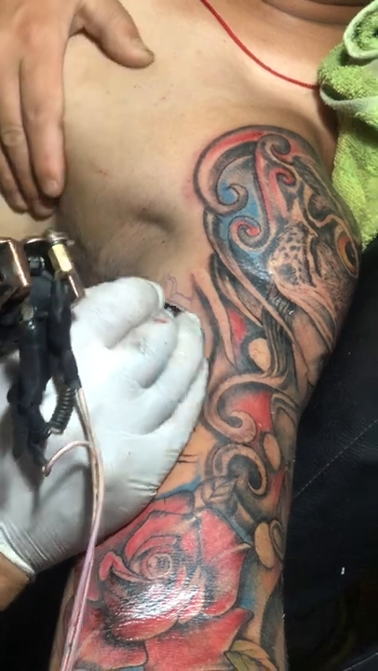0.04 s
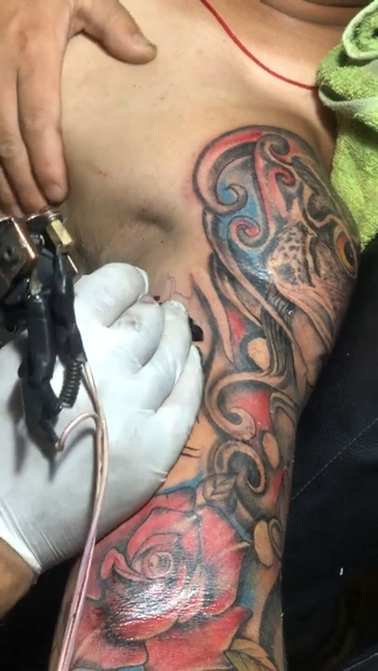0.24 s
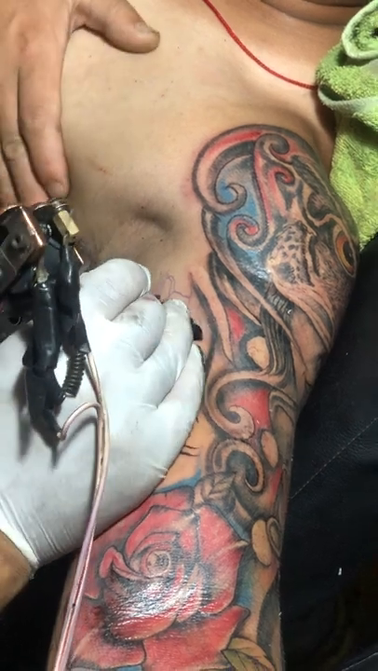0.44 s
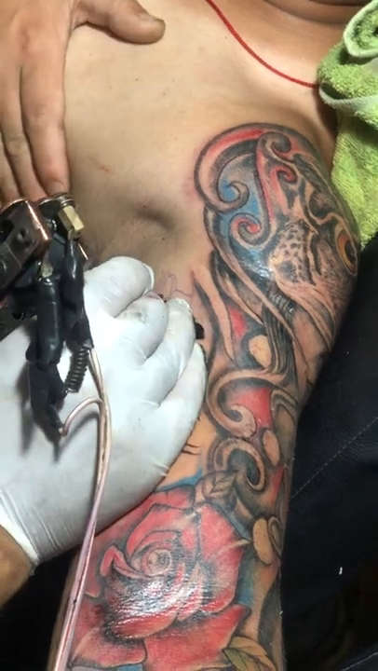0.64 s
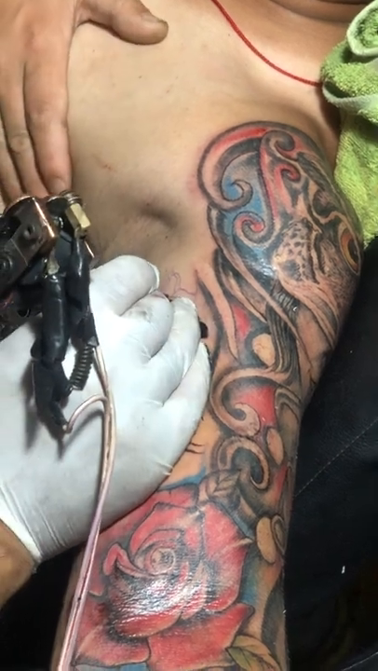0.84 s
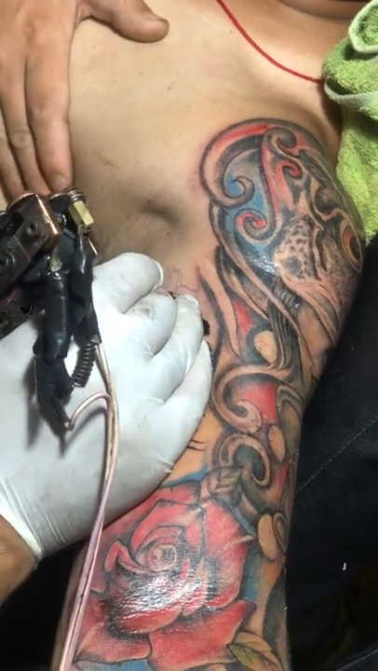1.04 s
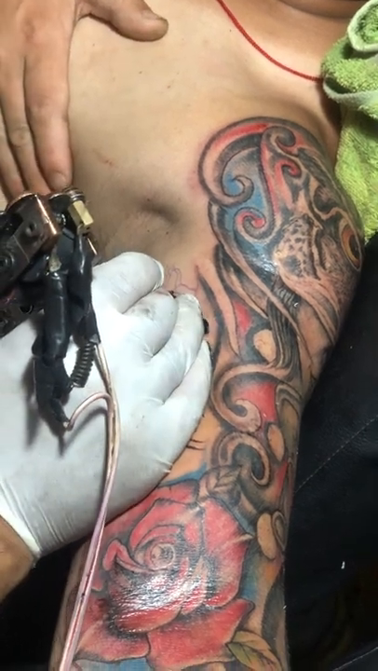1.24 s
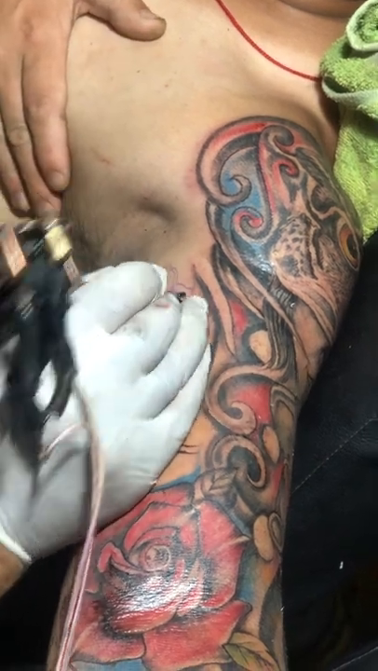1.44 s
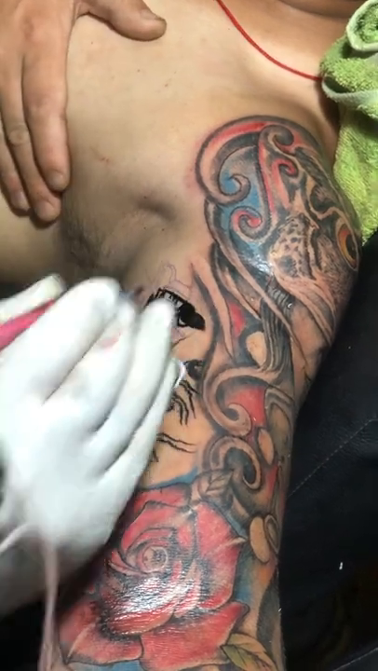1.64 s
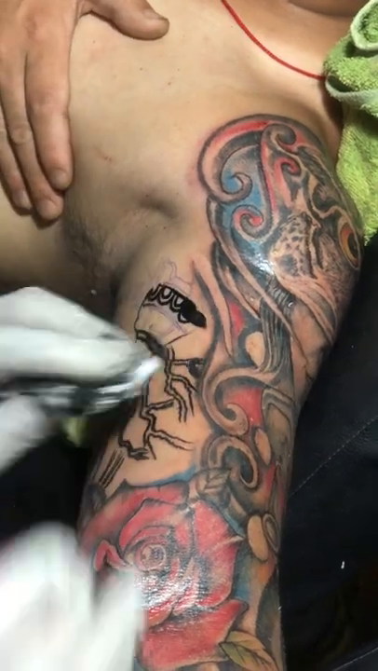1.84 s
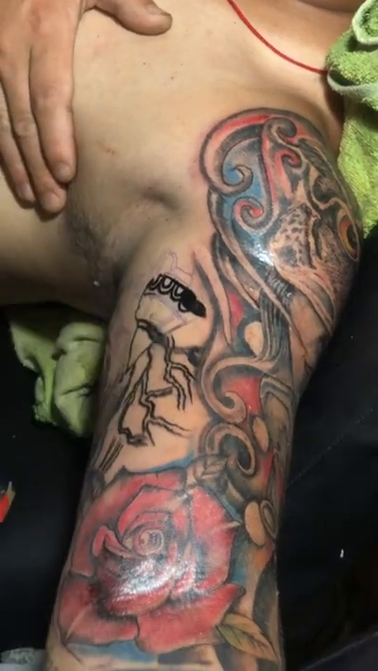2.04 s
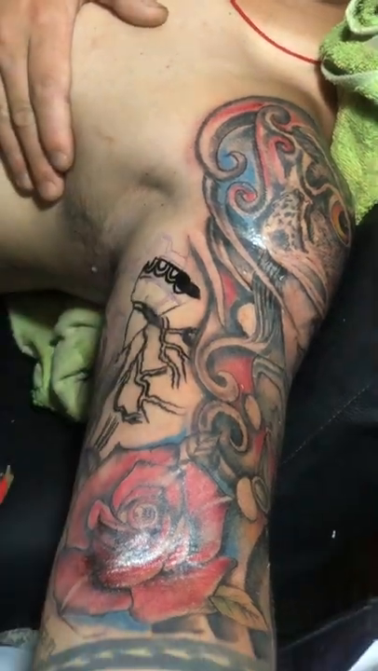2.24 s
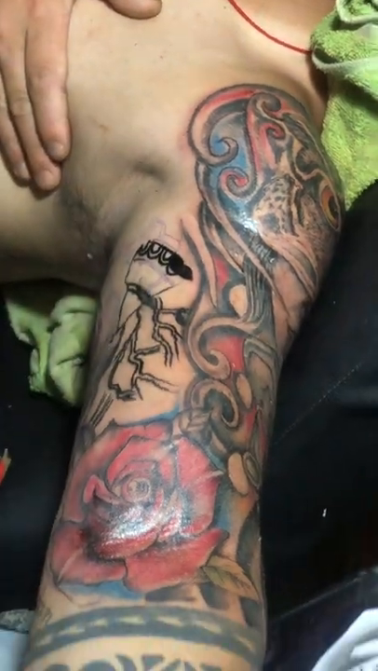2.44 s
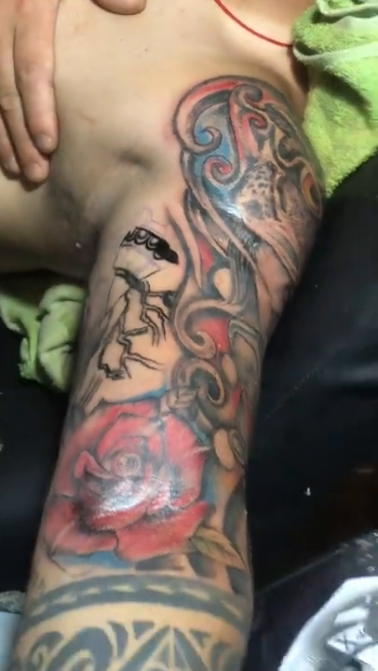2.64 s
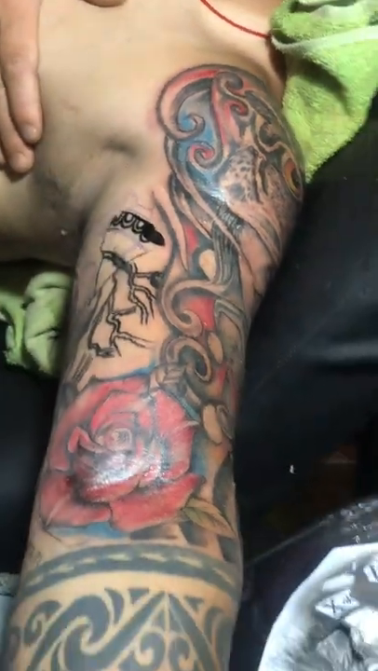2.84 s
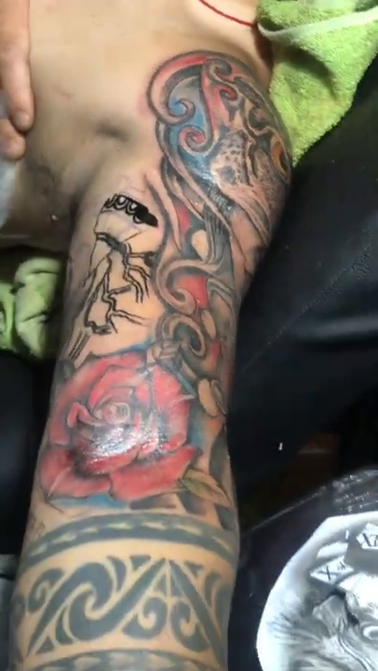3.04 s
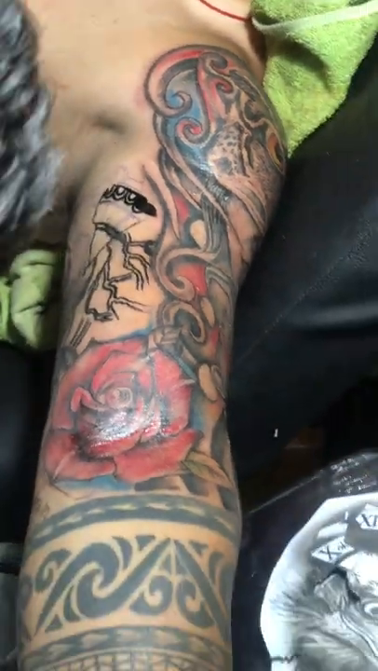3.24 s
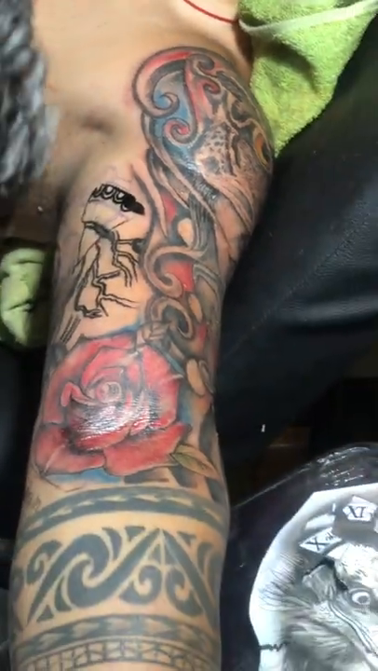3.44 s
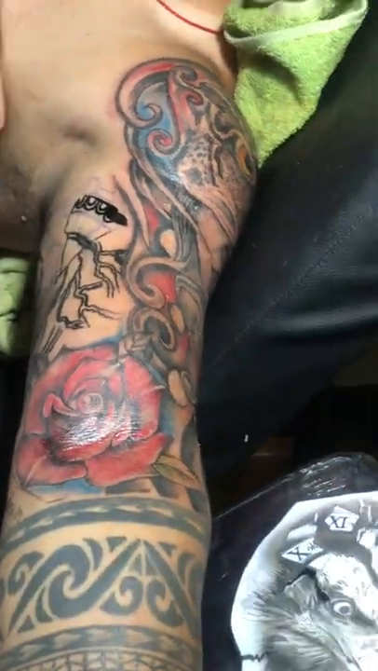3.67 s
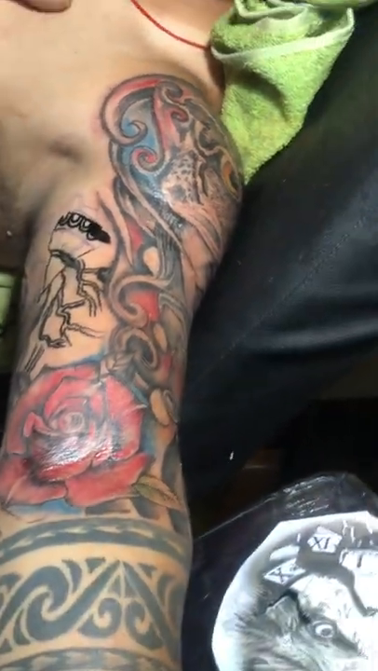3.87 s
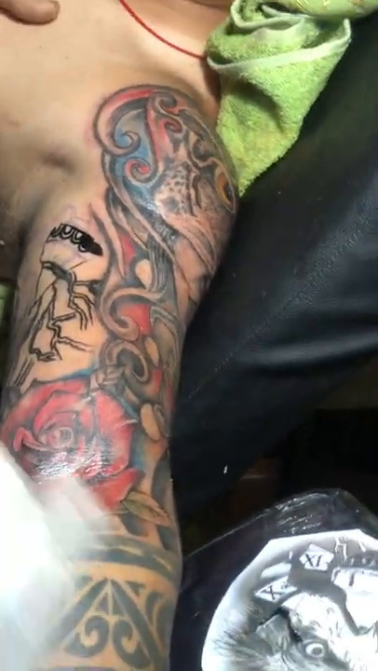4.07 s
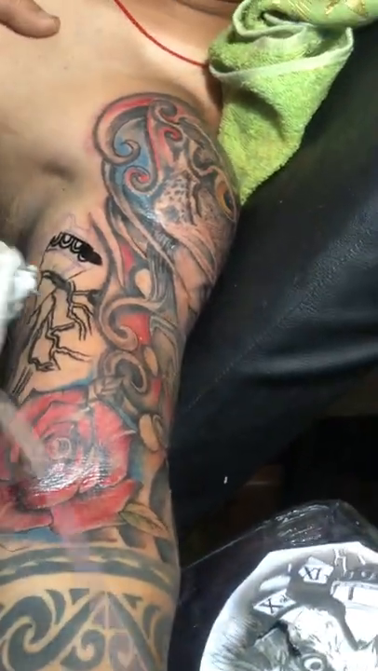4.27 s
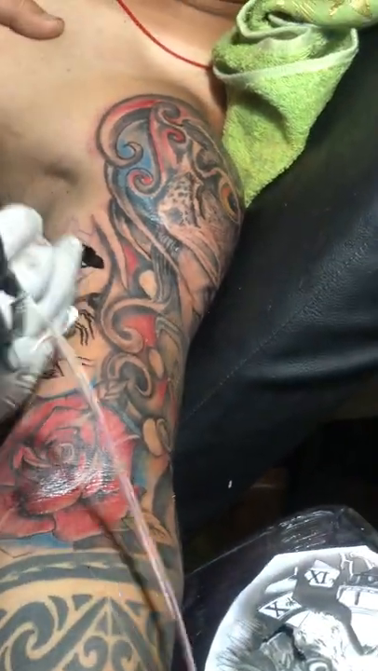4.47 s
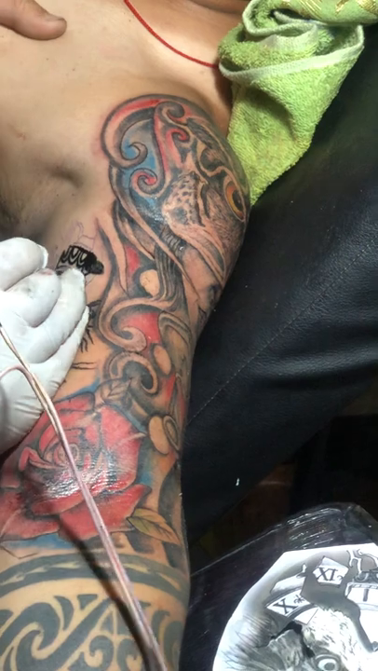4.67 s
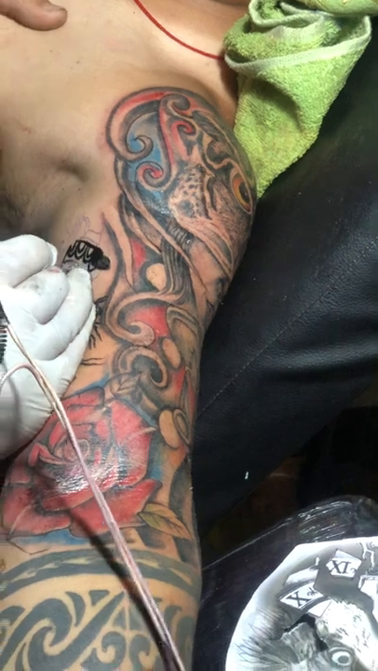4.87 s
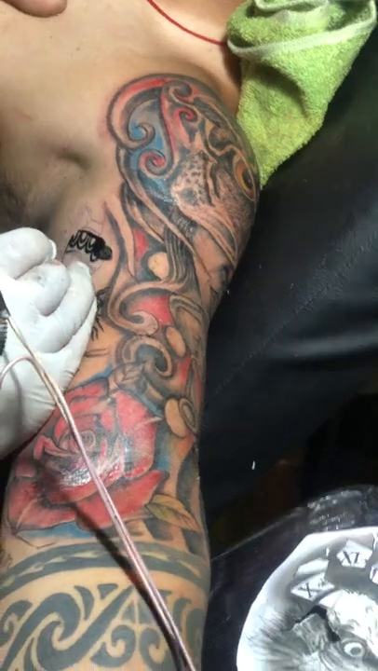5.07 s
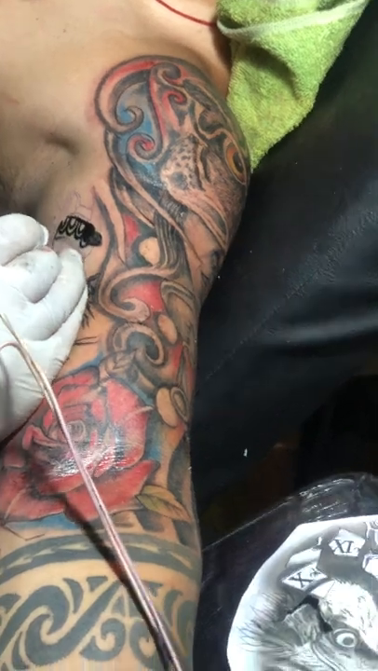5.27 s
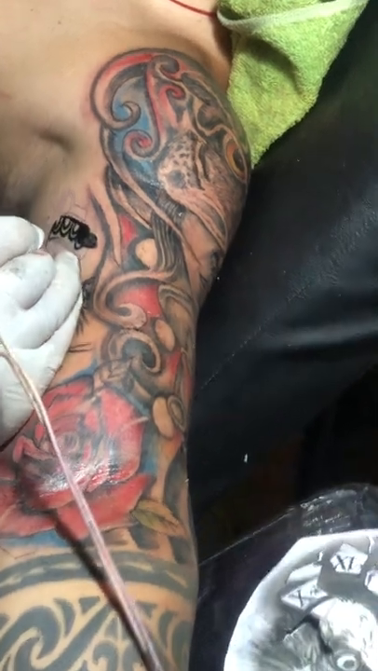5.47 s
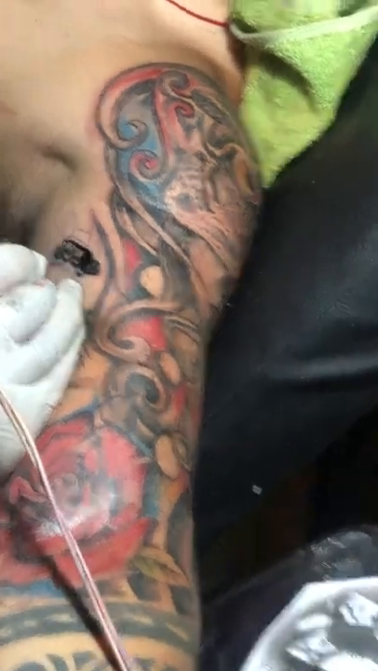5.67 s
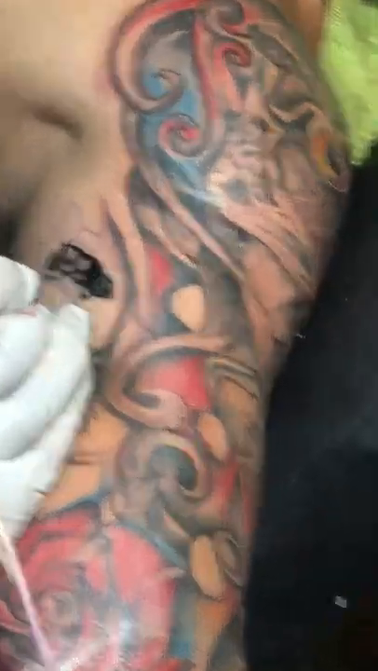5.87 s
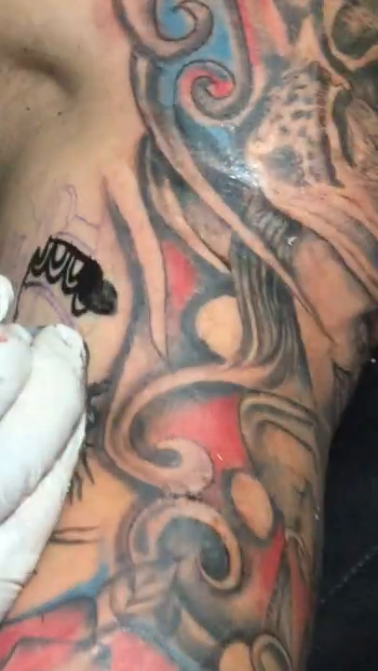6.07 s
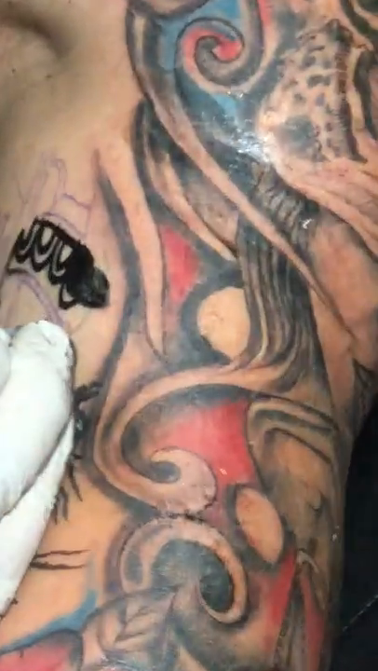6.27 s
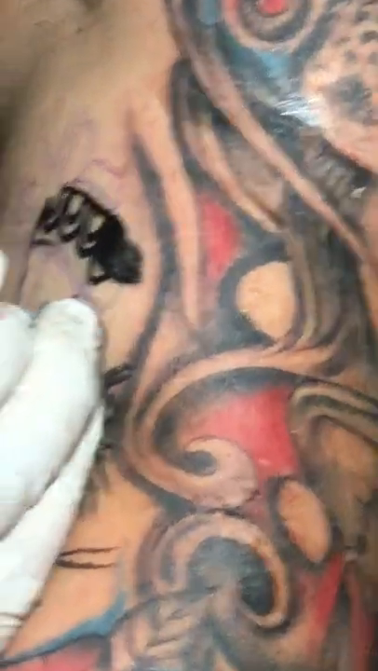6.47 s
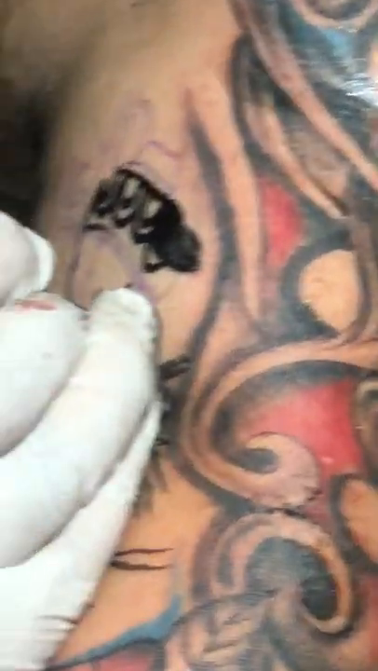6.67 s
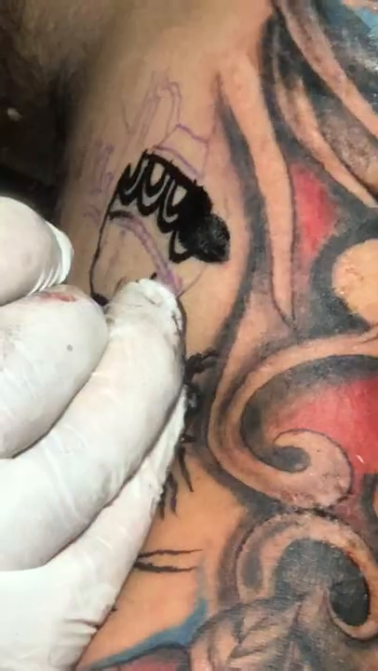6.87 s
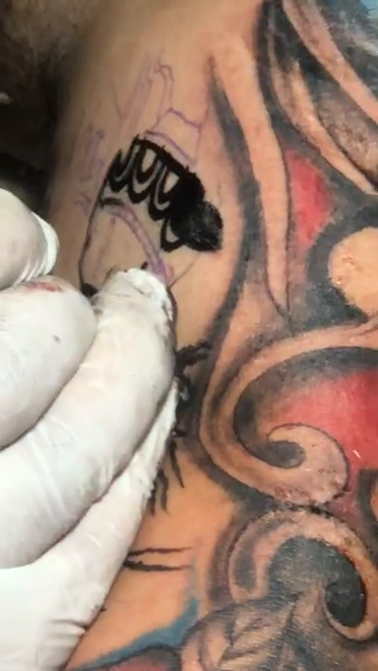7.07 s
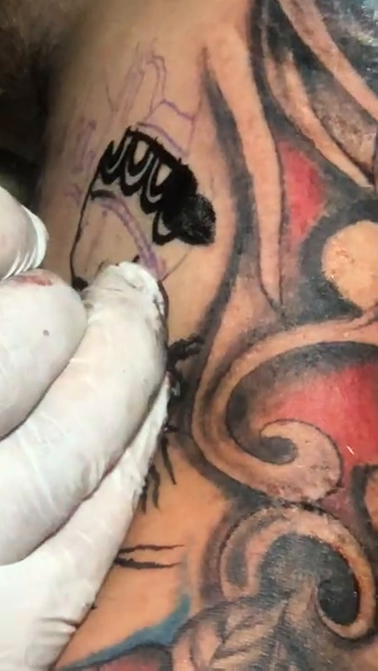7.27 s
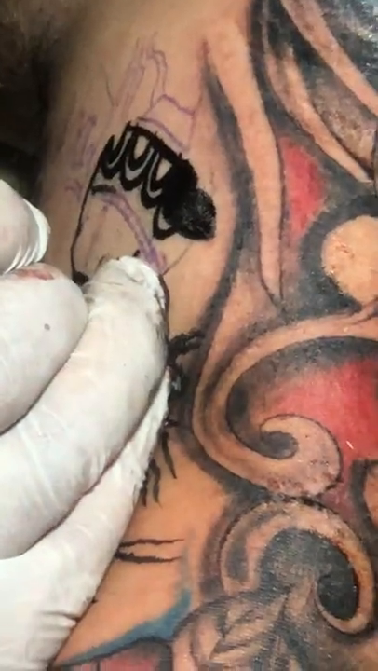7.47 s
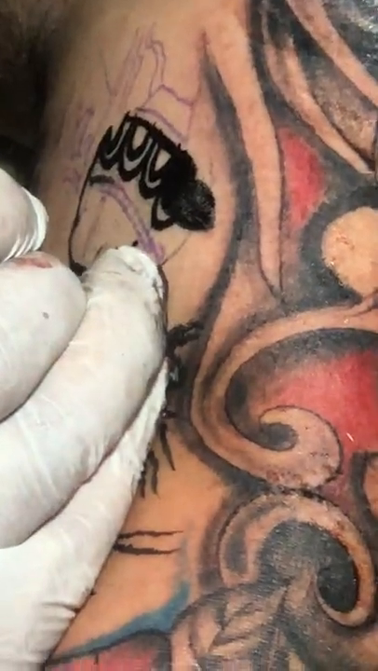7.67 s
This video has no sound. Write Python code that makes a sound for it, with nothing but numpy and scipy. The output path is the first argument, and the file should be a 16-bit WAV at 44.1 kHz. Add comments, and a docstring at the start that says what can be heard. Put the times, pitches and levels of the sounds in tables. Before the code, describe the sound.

In a small, fairly dry studio, the sharp metallic buzz of a tattoo machine pulses close up. It works on skin, stops for a moment of faint bumps and ticks, then restarts, rattling freely as it is turned in the air. It pauses again briefly before settling into a longer, steady spell on the skin, over a low hum and a faint distant drone.

```python
"""A close, throbbing buzz: a coil tattoo machine in a small studio, switched off twice and run in the air
between two spells on the skin. Its armature hits the coil core about 107 times a second; mains ripple on
the supply beats with the strokes and makes the throb. The colour shifts as the machine is turned, and it
rattles more in the air than in the skin.
Underneath: soft handling bumps, a plop, two ticks, room rumble, hum and a far drone."""
import sys
import numpy as np
from scipy import signal
from scipy.fft import rfft, irfft, next_fast_len
from scipy.io import wavfile
from scipy.ndimage import uniform_filter1d, map_coordinates

SR = 44100
rng = np.random.default_rng(int(sys.argv[2]) if len(sys.argv) > 2 else 0)


def generate_wav(sig):
    """Save sig (samples, or channels by samples) to the path in sys.argv[1] as 16-bit PCM at SR."""
    pcm = np.round(np.clip(np.atleast_2d(sig).T, -1, 1) * 32767).astype(np.int16)
    wavfile.write(sys.argv[1], SR, pcm)


N = 340000

# colours the machine throws at the microphone, one for each way it is held: f/Hz, level/dB
INKING = [(1500, -51), (2550, -27), (2770, -18.5), (3000, -16.5), (3400, -23), (4220, -7.5), (4800, -13.5),
          (5860, -7.5), (6570, -13.5), (7540, -7), (8260, -11.5), (9330, -5.5), (9920, -9.5), (10900, -14),
          (14800, -19.5), (15800, -50)]
LIFTED = [(1350, -31.5), (2900, -8), (3850, -12.5), (4750, -7.5), (6200, 0.5), (7110, -6), (8200, -3),
          (10300, -9.5), (11200, -0.5), (13000, -3.5), (13900, -8), (15800, -11)]
ASIDE = [(1350, -31), (4200, -13.5), (5070, -5.5), (5650, 1.5), (6500, -7), (8000, -11.5), (9000, -1.5),
         (9800, -5), (10400, -8.5), (11300, -3.5), (13000, -2), (14000, -11), (15800, -8)]
SWOOPING = [(1500, -29), (2900, -7), (4000, -12.5), (5400, -2), (7000, -1), (9600, -5), (11000, -11.5),
            (14000, -8), (14800, -2), (15800, -7)]
RETURNING = [(1350, -36), (2300, -21.5), (2900, -7), (3500, -19), (4750, -6), (6610, -5.5), (9200, -6),
             (10800, -11.5), (14800, -12)]
SETTLING = [(1530, -40), (2600, -24), (2900, -16), (3570, -21.5), (4200, -4.5), (4480, -13), (4720, -4),
            (5790, -10.5), (6340, -5.5), (7210, -12.5), (9170, -4), (10800, -14), (12400, -11),
            (13500, -14), (14700, -13), (15800, -23)]
BEARING = [(1530, -45), (2600, -15.5), (3500, -14), (4100, -3), (4800, -0.5), (5300, -4), (5880, -8.5),
           (6990, -5), (8440, -3.5), (9200, 1), (10800, -12.5), (12100, -7), (15800, -21)]
LINING = [(1530, -39), (2600, -19), (3000, -4.5), (3440, -15), (4100, -0.5), (4450, -10), (4900, 0.5),
          (5200, 0.5), (5560, 0), (6480, -7), (9240, 2), (11100, -6.5), (13300, -5), (15800, -18)]
# holds, each crossfading into the next: from/s, to/s, colour, click level/dB, lift off the skin/0-1
HOLDS = [(0, 1.417, INKING, 9, 0.02), (2.2, 2.382, RETURNING, 5, 0.21), (2.45, 2.9, LIFTED, 4, 0.27),
         (3.26, 3.659, ASIDE, 7.5, 0.8), (3.8, 3.96, SWOOPING, 6, 0.4), (4.3, 4.496, RETURNING, 5.5, 0.31),
         (4.667, 5.47, SETTLING, 5, 0.1), (5.704, 6.17, BEARING, 7, 0.1), (6.45, 7.797, LINING, 9.5, 0.11)]
# presses of the foot switch: on/s, off/s
PRESSES = [(0.0, 1.495), (2.3413, 3.962), (4.347, 7.71)]


def machine(ring_db=2.0, ring_t60=0.012, free_rattle_db=-5, skin_damping_db=14, knock_db=-25,
            return_db=-14, return_after_s=0.0033):
    """Each blow clicks, rings the steel and rattles the needle bar. Returns aimed and all-round sound."""
    # slow bending waves make the lower ringing trail the click: f/Hz, lag/s
    lag = [(2500, 0.001093), (4300, 0.0006), (6000, 0.0003), (9500, 0.000024)]
    # colour sent into the room, whatever the hold: f/Hz, level/dB
    room_colour = [(1700, -24.5), (2900, -4), (3600, -10.5), (4600, -0.5), (9500, -2), (10500, -5),
                   (15000, -8)]
    # dull push of the whole body: f/Hz, level/dB
    body_colour = [(300, -48), (850, 21.5), (1120, 13.0), (1550, 11.5), (2400, 18), (4000, 1.0)]
    times, gains, hardness = strokes()
    blows = pulses(times, gains)
    # the spring snaps back on its contact screw
    returns = times + return_after_s + .00012 * rng.standard_normal(len(times))
    contacts = blows + chatter(times, gains) + amp(return_db) * pulses(returns, gains)
    ring = amp(ring_db) * moving(contacts, lambda: dense_ring(ring_t60))
    rattle_power = np.abs(through(blows ** 2, dense_ring(t60=0.057) ** 2))
    rattle = np.sqrt(rattle_power) * rng.standard_normal(N)
    tones = ringing(blows, pulses(times, gains * hardness))
    aimed = tones
    for k, (_, _, colour, click_db, lift) in enumerate(HOLDS):
        share = held(np.arange(len(HOLDS)) == k)
        rattle_db = free_rattle_db - skin_damping_db * (1 - in_air(lift))
        steel = amp(click_db) * contacts + ring + amp(rattle_db) * rattle
        steel /= np.linalg.norm(amp([click_db, ring_db, rattle_db]))
        aimed = aimed + share * through(steel, click(colour))
    aimed = filtered(aimed, lambda hz: np.exp(-2j * np.pi * np.cumsum(along(lag, hz)) * hz[1]))
    knock = amp(knock_db) * through(blows, click(body_colour))
    return close_reflection(aimed) + knock, tones + through(contacts, click(room_colour))


def strokes(stroke_hz=107, start_slow_hz=1.46, spin_up_s=.06, mains_hz=50.0435, crest_s=.0027,
            throb_db=0.67, hurry_s=0.0002186, lead_rad=0.55, jitter_s=.000006, first_db=-6):
    """Times, strengths and hardness (0-1) of the armature's blows; from rest it starts a little slow."""
    # the speed drifts with load and grip: t/s, rate offset/Hz
    drift = [(0.0, 0.4), (0.65, 0.65), (1.5, 0.01), (2.95, -0.59), (3.75, 0.35), (3.96, -0.14),
             (4.95, -0.44), (5.4, 0.07), (6.3, -0.7), (7.7, -0.56)]
    runs = []
    for on, off in PRESSES:
        from_rest = on > 0
        t = np.arange(on, off, 1 / SR)
        slowing = from_rest * start_slow_hz * np.exp((on - t) / spin_up_s)
        rate = stroke_hz + np.interp(t, *np.transpose(drift)) - slowing
        cycles = np.cumsum(rate) / SR
        due = np.interp(np.arange(int(cycles[-1]) + 1), cycles, t)
        # a stroke near the crest of the rectified mains is pulled harder and comes sooner
        ripple = 2 * np.pi * 2 * mains_hz * (due - crest_s)
        level = throb_db * np.cos(ripple)
        level[0] += from_rest * first_db  # the first swing is weak
        times = due - hurry_s * np.cos(ripple + lead_rad) + jitter_s * rng.standard_normal(len(due))
        runs.append([times, amp(level) * np.sqrt(SR / stroke_hz), np.maximum(np.cos(ripple), 0)])
    return np.concatenate(runs, axis=1)


def chatter(times, gains, after_s=0.000403, spread_s=0.000597, db=-11, scatter_db=2.5):
    """The loose needle bar knocks unevenly in its eye just after each blow."""
    late, size = rng.standard_normal((len(times), 2)).T
    return pulses(times + after_s + spread_s * np.abs(late), gains * amp(db + scatter_db * size))


def ringing(blows, hard_blows, frame_db=-21, free_db=-20, zing_db=-5, air_db=-9,
            clang_db=4.5, clang_s=0.053):
    """Frame and springs ring most with the needle in the skin; in the air the free bar takes over."""
    # modes of the steel: f/Hz, level/dB, t60/s
    frame = [(1089, 3.5, 0.1), (1167, 1.5, 0.11), (1274, -5, 0.12), (1819, -2, 0.1), (2110, 0, 0.12),
             (2644, 8, 0.093), (3083, 1, 0.15)]  # woken by every blow
    springs = [(4228, 0, 0.11), (4660, -0.5, 0.1), (5078, -4, 0.1), (5185, -3.5, 0.1), (5290, 0, 0.1)]  # a high shimmer
    zing = [(3514, 3, 0.037), (5980, 13, 0.042), (7900, -1, 0.014), (9770, 13, 0.022), (9830, 19.5, 0.017)]  # woken by the harder blows only
    free_bar = [(856, -3.5, 0.1), (958, -4, 0.11), (1069, -0.5, 0.074), (2083, 2, 0.07), (2750, 17, 0.028)]  # needle bar swinging clear of the skin
    t = np.arange(N) / SR
    air = in_air(hand_lift())
    springs_db = np.interp(t, [5.47, 5.56], [-15.5, -6])  # a change of grip brings the springs up
    loaded = (amp(frame_db) * through(blows, modes(frame))
              + amp(springs_db) * through(blows, modes(springs))
              + amp(zing_db) * through(hard_blows, modes(zing)))
    free = amp(free_db) * through(blows, modes(free_bar))
    # the steel clangs harder just after switching on
    clang = sum((t >= on) * np.exp(-np.abs(t - on) / clang_s) for on, _ in PRESSES if on > 0)
    return amp(clang_db * clang) * (amp(air_db * air) * loaded + air * free)


def dense_ring(t60, size=4096, onset_s=0.0011, smooth_bins=25):
    """Many close modes that build up, share the energy evenly over the band and die together; energy 1."""
    age = np.arange(size) / SR
    build_up = 1 - np.exp(-(age / onset_s) ** 2)
    spectrum = rfft(rng.standard_normal(size) * amp(-60 * age / t60) * build_up)
    contour = np.sqrt(np.abs(uniform_filter1d(np.abs(spectrum) ** 2, smooth_bins)))
    return norm(irfft(spectrum / contour)[:size // 2])


def held(values):
    """One value per hold, gliding from each hold to the next."""
    edges = np.sort([s for hold in HOLDS for s in hold[:2]])
    return np.interp(np.arange(N) / SR, edges, np.repeat(values, 2))


def hand_lift():
    """How far the machine is raised off the skin, 0-1."""
    return held([hold[-1] for hold in HOLDS])


def in_air(lift, clear_lift=0.2514):
    """0 with the needle in the skin, 1 when it swings free."""
    return np.clip(lift / clear_lift, 0, 1)


def moving(x, new_response, creep_per_s=0.794, swing_per_s=5.55):
    """x through a response whose grain changes with travel: slowly on the skin, fast in the air."""
    place = np.cumsum(creep_per_s + swing_per_s * in_air(hand_lift())) / SR  # in treble wavelengths
    out = np.zeros(N + SR)
    for k in range(int(np.ceil(place[-1])) + 1):
        near = np.flatnonzero(np.abs(place - k) < 1)
        crossfade = np.cos(np.pi / 2 * (place[near] - k))
        part = signal.fftconvolve(x[near] * crossfade, new_response())
        out[near[0]:][:len(part)] += part
    return out[:N]


def close_reflection(x):
    """A near bounce, as off an arm, sweeps a comb through the treble as the machine swings out and back."""
    # path of the bounce: t/s, delay/s, strength/0-1
    path = [(3.62, 0.00052, 0), (3.75, 0.00056, 0.25), (3.96, 0.00068, 0.25), (4.35, 0.00069, 0.35),
            (4.5, 0.00056, 0.55), (4.74, 0.00053, 0)]
    t = np.arange(N) / SR
    times, delay, strength = np.transpose(path)
    share = np.interp(t, times, strength)
    echo = map_coordinates(x, [(t - np.interp(t, times, delay)) * SR])
    return (x + share * echo) / np.hypot(1, share)


def room_tail(size=256, predelay_s=.004):
    """The studio's short answer; treble dies first."""
    # reverb time: f/Hz, t60/s
    decay = [(300, 0.57), (4000, 0.32), (9000, 0.33), (15000, 0.31)]
    hz, t, spectra = signal.stft(rng.standard_normal(SR // 3), SR, nperseg=size)
    tail = signal.istft(spectra * amp(-60 * t / along(decay, hz)[:, None]), SR, nperseg=size)[1]
    return np.pad(norm(tail), (int(predelay_s * SR), 0))


def plop(start_s=2.6245, db=-24.5, high_hz=620, low_hz=105, fall_s=0.004, rise_s=0.0042):
    """One soft knock whose pitch drops at once."""
    age = np.maximum(np.arange(N) / SR - start_s, 0)
    hz = low_hz + (high_hz - low_hz) * np.exp(-age / fall_s)
    envelope = amp(db) * age / rise_s * np.exp(1 - age / rise_s)
    return envelope * np.sin(2 * np.pi * np.cumsum(hz * (age > 0)) / SR)


def handling(tick_t60=0.018):
    """Soft handling bumps and two light ticks: bursts of dull and of bright noise."""
    # bump cues: t/s, peak level/dB, length/s
    bumps = [(0.836, -38.5, 0.098), (1.712, -32.5, 0.021), (1.844, -35, 0.049), (2.554, -42, 0.2),
             (5.453, -39.5, 0.17), (5.991, -39, 0.11), (6.072, -33, 0.028), (6.257, -38, 0.035),
             (6.447, -40, 0.094)]
    # tick cues: t/s, level/dB
    ticks = [(2.0524, -36.5), (2.144, -47)]
    # their colours: f/Hz, level/dB
    bump_colour = [(25, -12), (60, 6.5), (140, 11), (220, 2), (450, -6), (1000, -43), (3000, -80)]
    tick_colour = [(2000, -31), (5500, -21), (6900, 8), (8000, -12), (10000, -10), (15000, -28)]
    t = np.arange(N) / SR
    bump_envelope, tick_envelope = np.zeros(N), np.zeros(N)
    for start, db, length in bumps:
        progress = np.maximum(t - start, 0) / length * 4  # peaks a quarter of the way in
        bump_envelope += amp(db) * progress * np.exp(1 - progress)
    for start, db in ticks:
        tick_envelope += (t >= start) * amp(db - 60 * np.abs(t - start) / tick_t60)
    return bump_envelope * noise(bump_colour) + tick_envelope * noise(tick_colour)


def background(rumble_db=-46, hum_db=-58, drone_floor_db=-62.5, rise_s=0.62, fall_s=0.74):
    """Steady room rumble, a low fuzzy hum and a distant drone that swells and fades."""
    # colours of the three beds: f/Hz, level/dB
    rumble_colour = [(15, -52), (25, -27), (59, -2), (94, -11.5), (113, -2.5), (307, -9.5), (513, -11.5),
                     (769, -12.5), (1220, -17), (2260, -22), (8490, -33.5), (15800, -49)]
    drone_colour = [(100, -21), (150, 0.5), (205, 4.5), (255, -4.5), (310, 3), (360, -9), (500, -53)]
    hum_colour = [(40, -48), (58, -7), (65, -6), (73, 21), (100, -53), (400, -100)]
    # swells of the drone: from/s, to/s, level/dB
    swells = [(.6, 1.3, -47.5), (2.947, 4.705, -45)]
    t = np.arange(N) / SR
    drone_power = np.full(N, amp(drone_floor_db) ** 2)
    for start, end, db in swells:
        swell = np.exp(-np.maximum(start - t, 0) / rise_s - np.maximum(t - end, 0) / fall_s)
        drone_power += (amp(db) * swell) ** 2
    hum = amp(hum_db) * noise(hum_colour)
    return amp(rumble_db) * noise(rumble_colour) + hum + np.sqrt(drone_power) * noise(drone_colour)


def amp(db):
    """Decibels to gain."""
    return 10 ** (np.asarray(db) / 20)


def norm(x):
    """Scale to energy 1."""
    return x / np.sqrt(np.sum(x ** 2) + 1e-20)


def along(points, hz):
    """Read a curve of (f/Hz, value) points on a log frequency axis."""
    f, values = np.transpose(points)
    return np.interp(np.log(hz + 1), np.log(f), values)


def filtered(x, response):
    """x shaped by a frequency response."""
    size = next_fast_len(len(x) + 8192)
    return irfft(rfft(x, size) * response(np.fft.rfftfreq(size, 1 / SR)), size)[:len(x)]


def through(x, response):
    """x convolved with an impulse response."""
    return signal.fftconvolve(x, response)[:N]


def noise(colour):
    """Coloured noise of rms 1."""
    return np.sqrt(N) * norm(filtered(rng.standard_normal(N), lambda hz: amp(along(colour, hz))))


def click(colour, size=1024):
    """The tightest causal pulse of this colour (minimum phase), energy 1."""
    cepstrum = irfft(np.log(amp(along(colour, np.fft.rfftfreq(size, 1 / SR)))))
    cepstrum[1:size // 2] *= 2
    cepstrum[size // 2 + 1:] = 0
    return norm(irfft(np.exp(rfft(cepstrum))))


def modes(table):
    """Damped sines, energy 1."""
    age = np.arange(SR // 8) / SR
    return norm(sum(amp(db - 60 * age / t60) * np.sin(2 * np.pi * hz * age) for hz, db, t60 in table))


def pulses(times, gains, size=8):
    """Impulses placed between samples with a windowed sinc."""
    at = times[:, None] * SR
    index = np.floor(at).astype(int) + np.arange(1 - size, size + 1)
    window = np.cos(np.pi * (index - at) / (2 * size)) ** 2
    taps = gains[:, None] * np.sinc(index - at) * window
    return np.bincount(np.clip(index, 0, N).ravel(), taps.ravel(), N + 1)[:N]


def scene(direct_db=-0.38, room_db=-33.5):
    """The close buzz and a touch of room, over the small noises."""
    # level ride as the machine turns towards and away from the microphone: t/s, gain/dB
    ride = [(1.4, -25.5), (2.35, -26), (2.7, -26.5), (3.03, -27), (3.45, -23.5), (3.9, -22.5), (4.9, -27),
            (5.85, -25), (6.3, -26), (7.1, -25.1)]
    aimed, all_round = machine()
    buzz = amp(direct_db + np.interp(np.arange(N) / SR, *np.transpose(ride))) * aimed
    room = amp(room_db) * moving(all_round, room_tail)
    return (buzz + room + background() + handling() + plop())[None]


def record(dry, top_hz=15850):
    """A steep high cut takes off the very top."""
    return filtered(dry[0], lambda hz: 1 / np.sqrt(1 + (hz / top_hz) ** 600))[None]


dry = scene()
out = record(dry)
generate_wav(out)
```